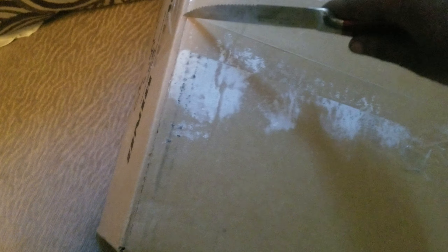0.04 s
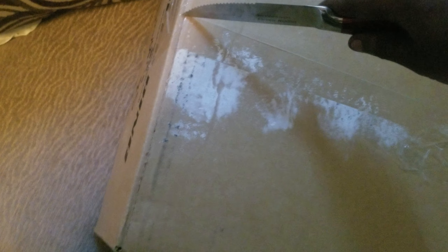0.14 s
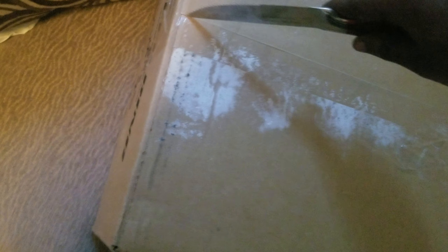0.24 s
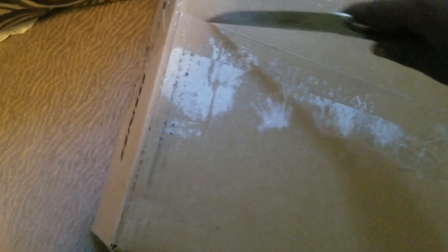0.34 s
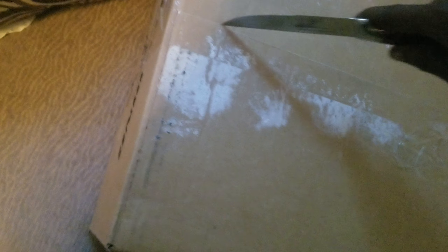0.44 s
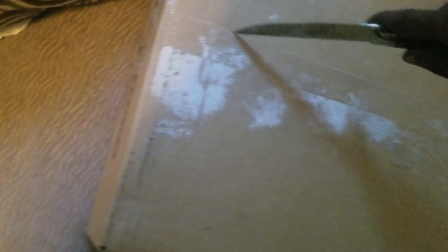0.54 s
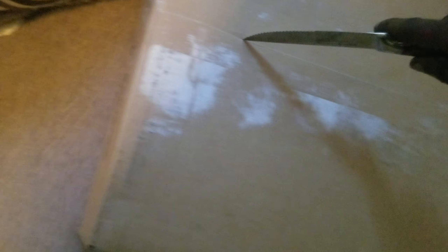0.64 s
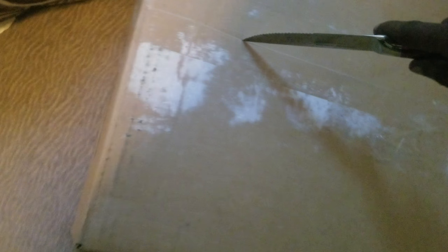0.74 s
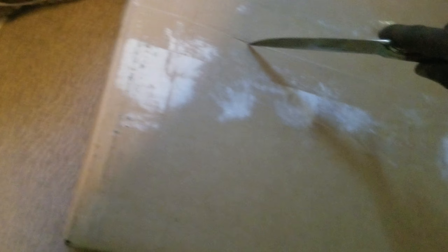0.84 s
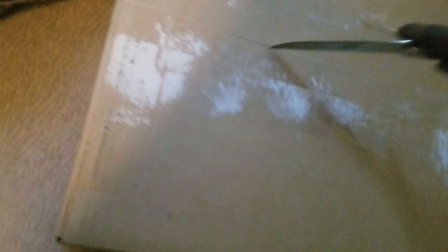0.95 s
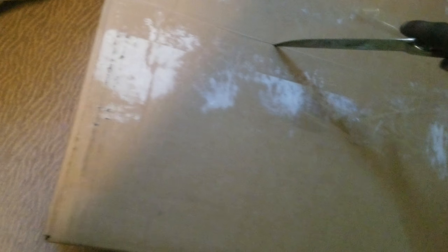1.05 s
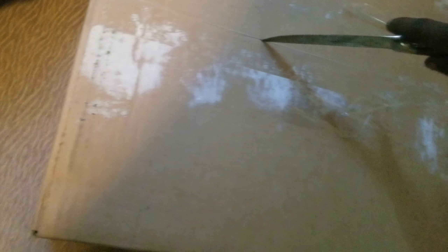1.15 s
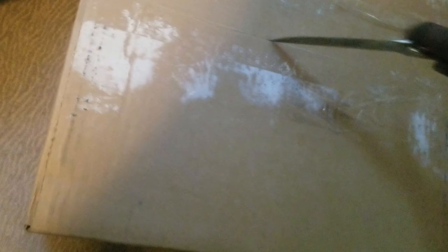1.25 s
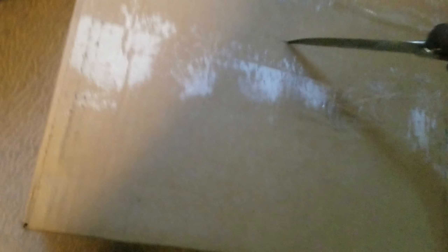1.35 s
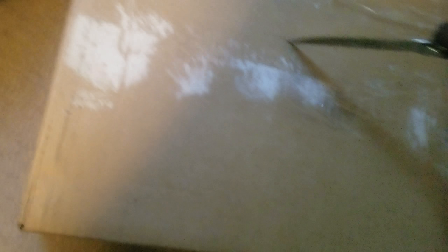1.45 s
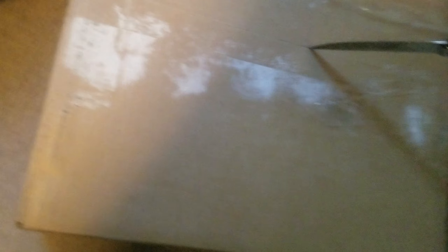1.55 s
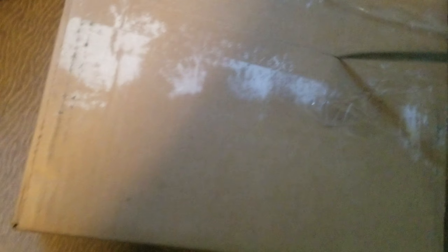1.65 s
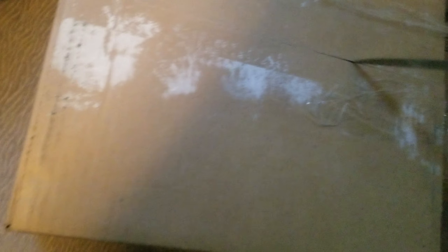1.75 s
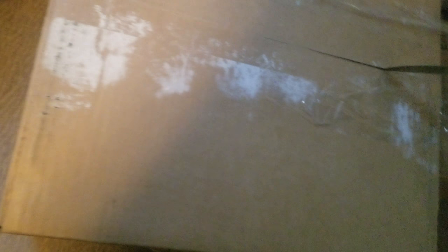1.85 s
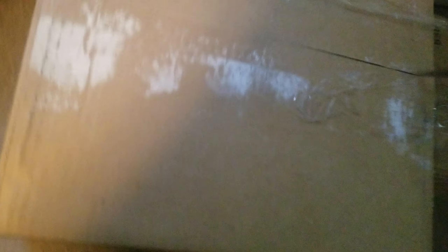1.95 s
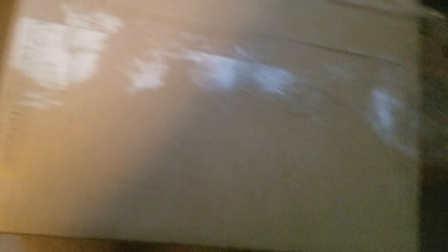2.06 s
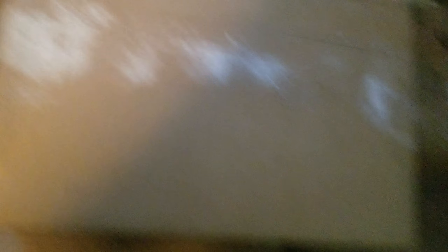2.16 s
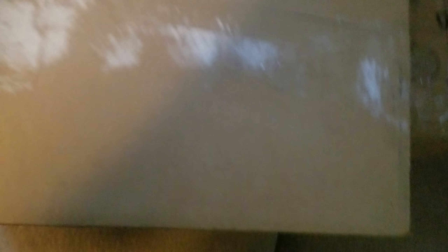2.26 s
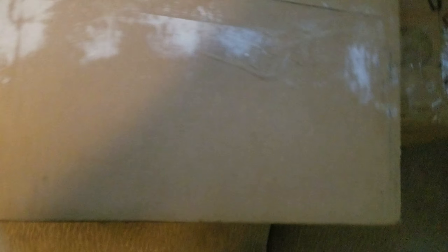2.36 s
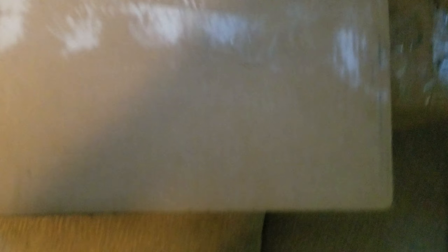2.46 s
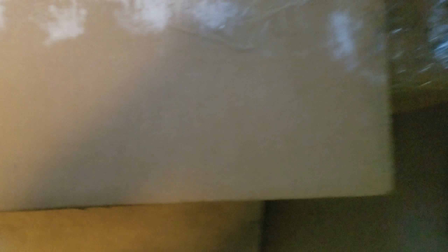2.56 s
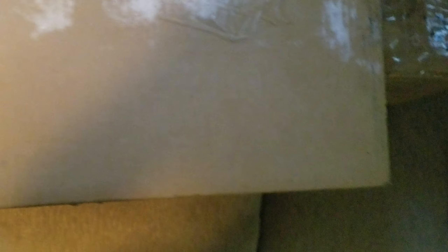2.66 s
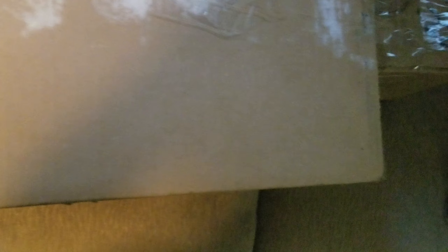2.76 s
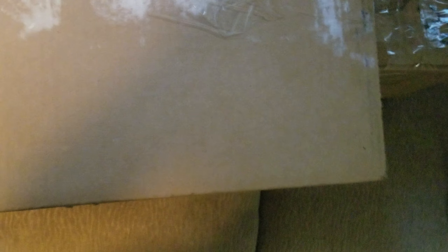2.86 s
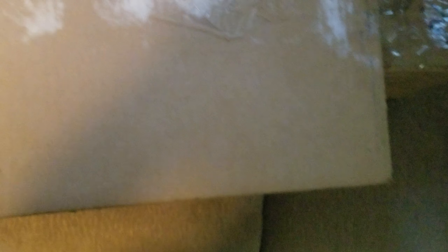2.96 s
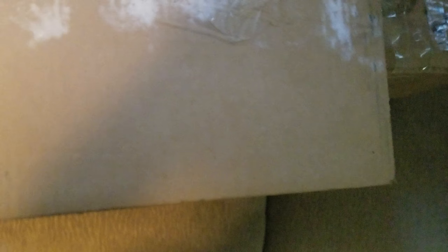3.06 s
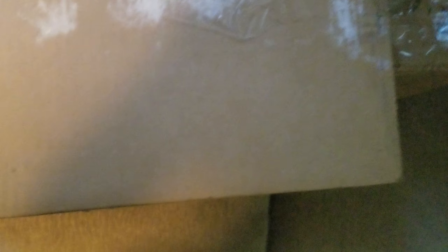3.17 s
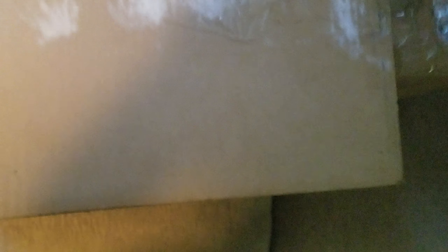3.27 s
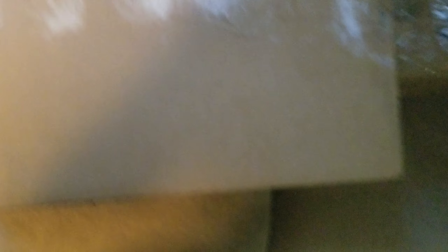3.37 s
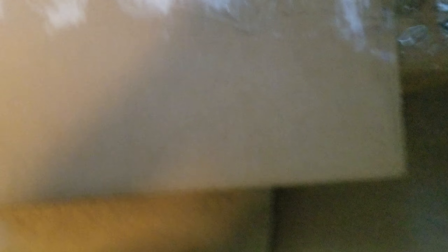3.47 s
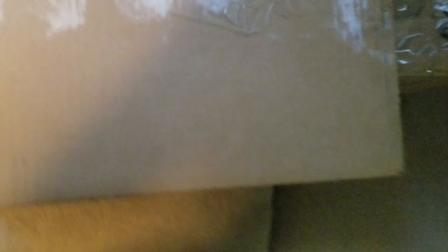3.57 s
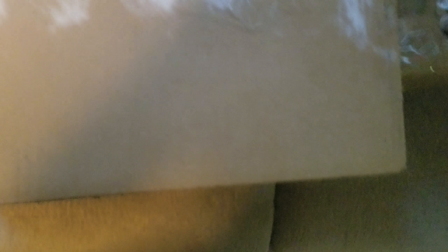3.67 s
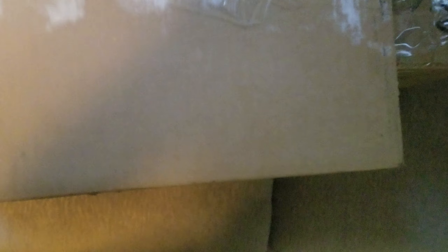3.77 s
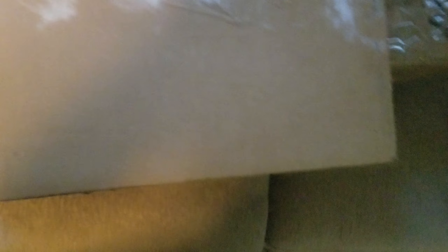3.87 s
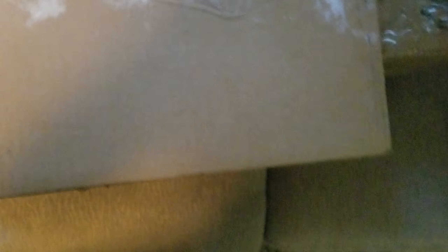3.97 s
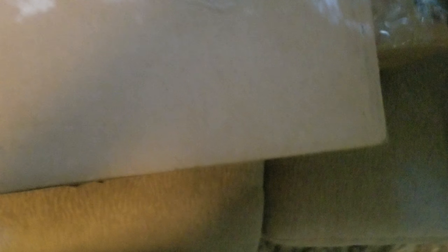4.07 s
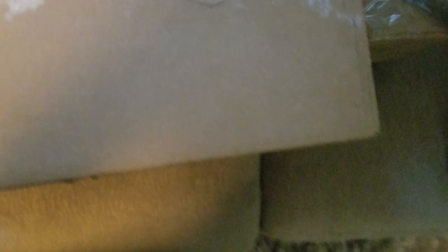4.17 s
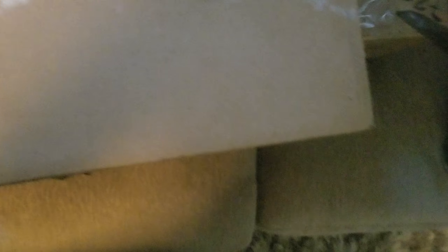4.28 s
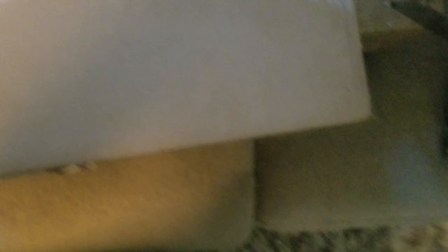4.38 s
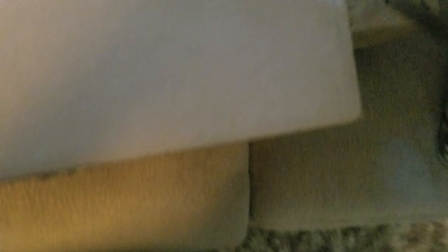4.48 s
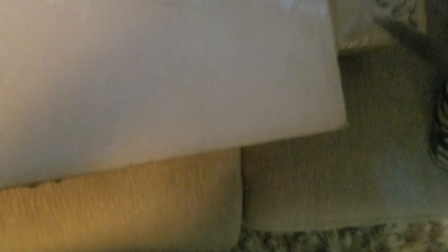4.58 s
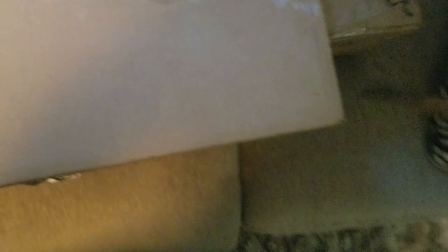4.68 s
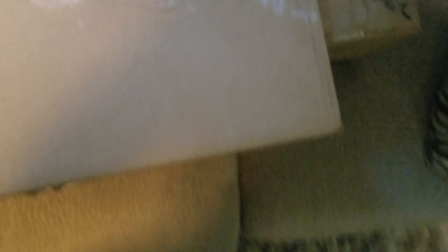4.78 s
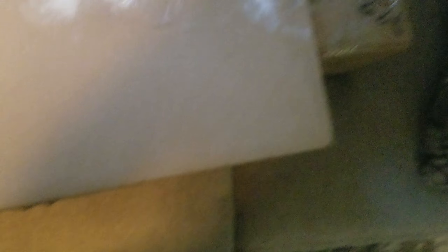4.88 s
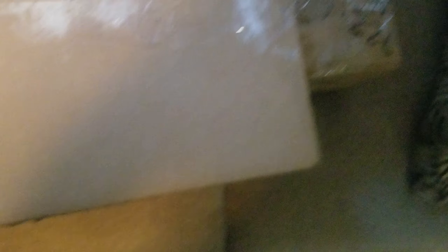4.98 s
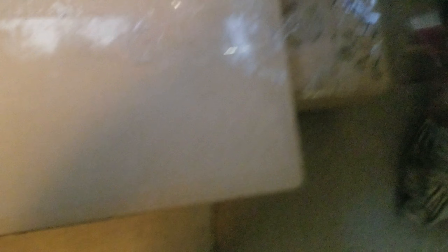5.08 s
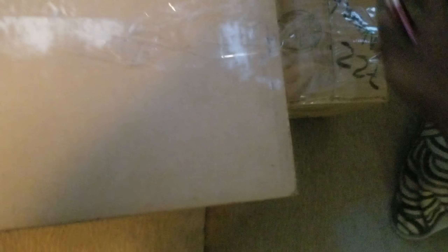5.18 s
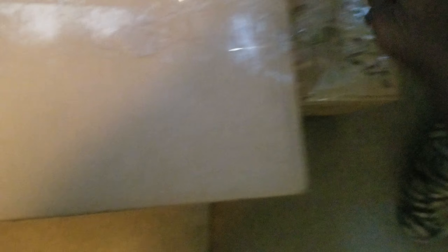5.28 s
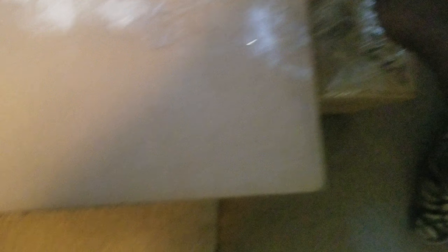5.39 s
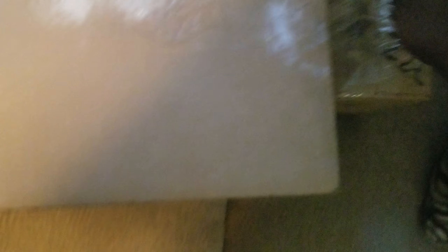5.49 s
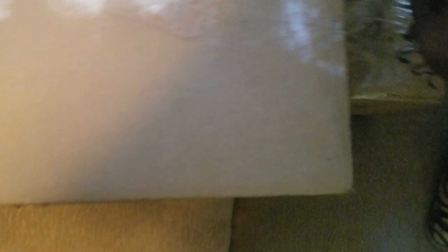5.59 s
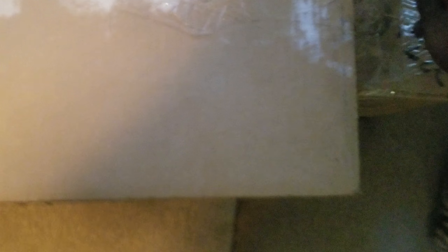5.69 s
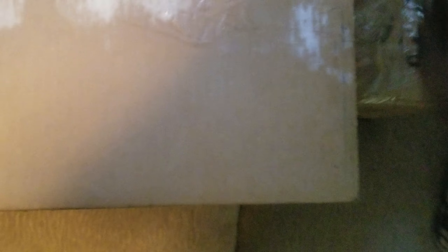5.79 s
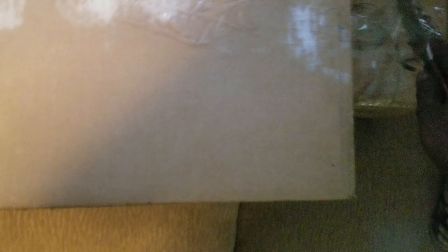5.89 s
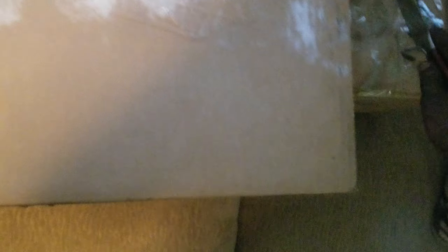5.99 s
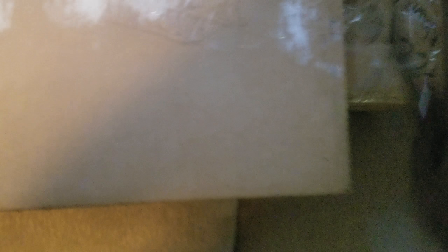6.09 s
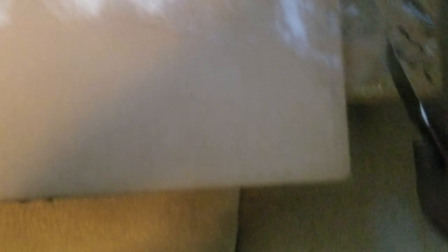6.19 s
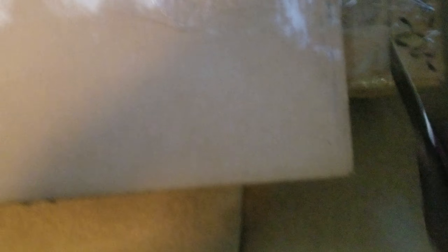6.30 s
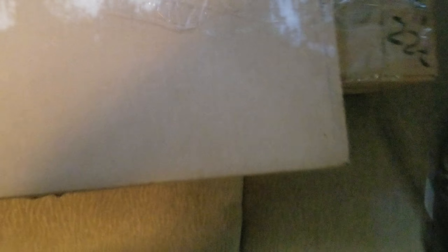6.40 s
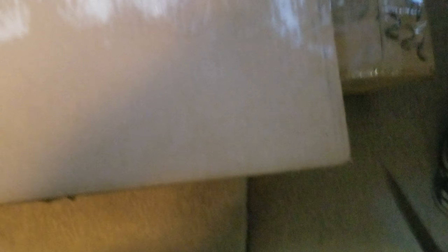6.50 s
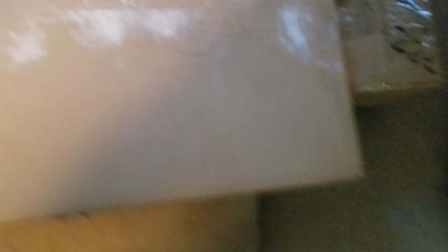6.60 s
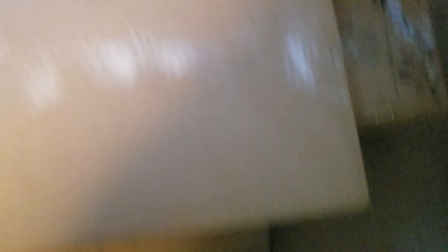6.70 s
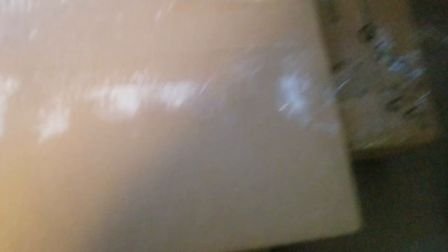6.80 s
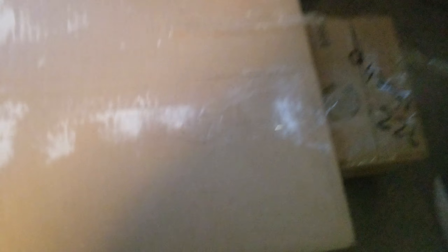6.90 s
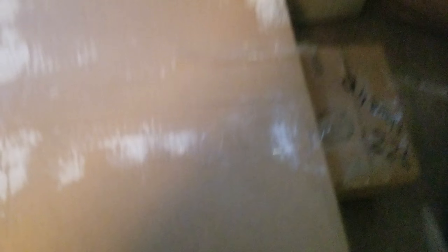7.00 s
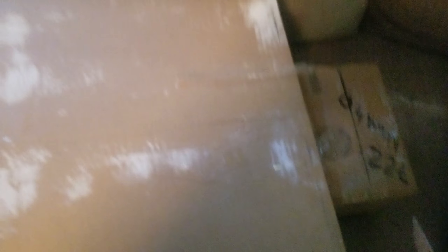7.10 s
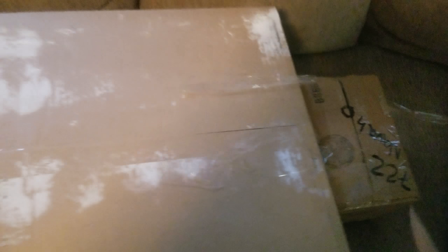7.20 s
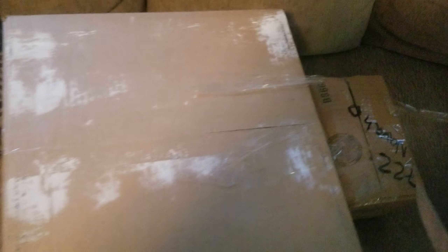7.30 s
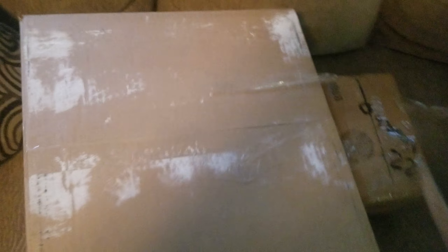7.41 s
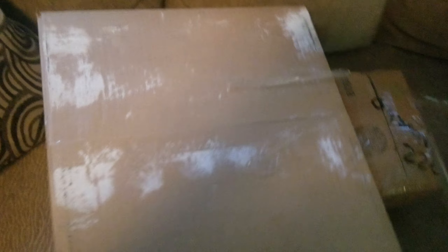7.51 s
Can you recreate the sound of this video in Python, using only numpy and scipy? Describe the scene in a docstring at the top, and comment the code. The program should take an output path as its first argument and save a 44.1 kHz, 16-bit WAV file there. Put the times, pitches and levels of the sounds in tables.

```python
"""A quiet living room, taken close with a hand-held pair of microphones over a faint hiss and a low hum.
A knife tip drags through plastic wrap over a cardboard box, skipping on the corrugations, then saws and
picks at the film round a second, smaller box. Uneven slips of the tip excite the film, which snaps and
crackles, and the cardboard, which rasps and rumbles. Damped swings make the hollow box thud, a thin sine
is the blade singing, and short puffs of noise rustle nearby."""
import sys
import numpy as np
from scipy import signal
from scipy.fft import rfft, irfft
from scipy.io import wavfile
from scipy.ndimage import map_coordinates

SR = 44100
rng = np.random.default_rng(int(sys.argv[2]) if len(sys.argv) > 2 else 0)


def master(y):
    """Save y as 16-bit WAV."""
    cut = np.clip(np.atleast_2d(y).T, -1, 1)
    pcm = np.round(cut * 32767)  # scale
    wavfile.write(sys.argv[1], SR, pcm.astype(np.int16))


N = 332514  # length in samples


def gain_of(db):
    """Decibels to amplitude."""
    return 10 ** (np.asarray(db) / 20)


def evened(x):
    """Scales to unit rms."""
    return x / np.sqrt(np.mean(x ** 2) + 1e-20)


def peaked(x):
    """Scales to unit peak."""
    return x / (abs(x).max() + 1e-12)


def read(points, hz):
    """Looks a table up on a log-frequency axis."""
    f, value = np.transpose(points)
    return np.interp(np.log(hz + 1), np.log(f + 1), value)


def add(mix, s, sound):
    """Mixes a sound in at time s, cutting it off at the end of the mix."""
    part = mix[round(s * SR):][:len(sound)]
    part += sound[:len(part)]


def colour(x, points):
    """Causal minimum-phase filter with the gain curve of a (hz, gain_db) table."""
    gain_db = np.maximum(read(points, abs(np.fft.fftfreq(8192, 1 / SR))), -100)
    log_gain = np.log(gain_of(gain_db))
    response = np.exp(np.conj(signal.hilbert(log_gain)))
    taps = np.fft.ifft(response).real[:4096]
    return signal.oaconvolve(x, taps[(None,) * (x.ndim - 1)], axes=-1)[..., :x.shape[-1]]


def resonate(x, hz, width):
    """One damped resonance of gain 1, its width in Hz."""
    pole = np.exp((2j * np.pi * hz - np.pi * width) / SR)
    return 2 * signal.lfilter([1 - abs(pole)], [1, -pole], x).real


def band(x, lo_hz, hi_hz):
    """Band-pass."""
    return signal.sosfilt(signal.butter(2, [lo_hz, hi_hz], "bandpass", fs=SR, output="sos"), x)


def diffuse(a, b):
    """Two unrelated signals become a pair that is much alike in the bass and little in the treble."""
    # Likeness of diffuse sound at the two microphones: hz, likeness (0 to 1)
    likeness = [(60, 0.83), (300, 0.84), (640, 0.24), (1400, 0.14), (3000, 0.092)]
    alike = np.clip(read(likeness, np.fft.rfftfreq(len(a), 1 / SR)), 0, 1)
    mixed = alike * rfft(a) + np.sqrt(1 - alike ** 2) * rfft(b)
    return np.array([a, irfft(mixed, len(a))])


def grit(size, per_s, spread_db, bed):
    """Tiny slips of uneven strength over a smooth bed of friction."""
    strength = gain_of(spread_db * np.minimum(rng.exponential(1, size), 4))
    slips = strength * (rng.random(size) < per_s / SR)
    slips = signal.lfilter([1], [1, -np.exp(-1 / (0.00047 * SR))], slips)  # each decays in 0.47 ms
    return evened((bed + evened(slips)) * rng.standard_normal(size))


def room_tone():
    """Faint hiss, and a low drone swelling in the room's standing waves."""
    # Spectrum of the hiss: hz, gain_db
    air_curve = [(70, -18), (180, -5.5), (300, -10), (600, -21.5), (850, -22.5), (1150, -14.5),
                 (2000, -18.5), (3100, -23.5), (4030, -20), (5200, -30.5), (7500, -29), (8300, -42),
                 (14000, -57)]
    # Steady resonances of the drone: pitch_hz, width_hz, level_db
    hum_rows = [(40, 68, -82), (61.7, 18, -72.5), (154.1, 10.4, -68), (238.3, 18, -72.5)]
    # Swelling and fading of two stronger low tones: time_s, lower_level_db, upper_level_db
    tone_levels = [(0, -44.5, -68), (0.6, -65, -48), (2.1, -66, -58.5), (2.5, -58, -70), (3.1, -69, -52),
                   (3.7, -65.5, -68), (4.801, -70, -62), (5.198, -65.5, -68.5), (6.498, -58, -63),
                   (7.54, -59, -58.5)]
    tones_hz = (91.4, 123.4)
    hiss = colour(rng.standard_normal((2, N)), air_curve)
    hiss *= gain_of(-67) / np.sqrt(np.mean(band(hiss, 300, 16000) ** 2))

    drone = np.zeros(N)
    for hz, width, db in hum_rows:
        once = resonate(rng.standard_normal(N), hz, width)
        drone += gain_of(db) * evened(resonate(once, hz, width))

    s, *tones_db = np.transpose(tone_levels)
    t = np.arange(N) / SR
    for hz, db in zip(tones_hz, tones_db):
        fuzz = evened(resonate(rng.standard_normal(N), hz, 11))
        tone = evened(np.sin(2 * np.pi * hz * t) + 1.1 * fuzz)
        drone += gain_of(np.interp(t, s, db)) * tone
    return diffuse(*hiss) + drone


def drag():
    """The same slips excite film, cardboard face and box hollow; each move has its own film pitch."""
    # Strokes of the blade rubbing along: start_s, length_s, level_db, film_pitch_hz, card_rel_db
    stroke_rows = [(0, 0.34, -56, 3940, -5), (0.239, 0.11, -49.5, 5160, 0.5), (0.45, 0.39, -65, 5100, 5),
                   (0.85, 0.07, -43, 2590, 2.5), (1.147, 0.21, -52, 2820, 3), (1.421, .37, -50, 3380, 3.5),
                   (1.737, 0.26, -43, 2930, 6), (3.177, 0.17, -49, 3850, -2), (3.433, 0.13, -49, 3930, -4),
                   (3.683, 0.061, -40, 3700, 1), (3.771, 0.031, -52, 4160, 3), (3.868, 0.13, -51, 3560, 2),
                   (4.079, 0.11, -50.5, 4020, 1), (4.451, 0.1, -52, 4180, -5),
                   (4.603, 0.087, -59.5, 4130, 1.5), (5.277, 0.22, -46.5, 2230, -4.5),
                   (5.542, 0.12, -52.5, 3100, -3.5), (5.673, 0.075, -43.5, 3700, -2.5),
                   (5.738, 0.12, -35, 3500, 0), (5.956, 0.085, -37.5, 4050, 0),
                   (6.22, 0.14, -37, 4000, 0.5)]
    # Rips where the film gives way at once and the tear dies out:
    # start_s, decay_s, level_db, film_pitch_hz, card_rel_db
    rip_rows = [(0.396, 0.067, -40, 1920, -0.5), (0.74, 0.073, -39, 2050, 2),
                (0.932, 0.038, -29.5, 3270, -1.5), (2.723, 0.11, -55.5, 2370, -6),
                (3.063, 0.053, -45, 3670, -11.5), (3.362, 0.022, -27, 3700, -1),
                (3.519, 0.027, -36, 3760, -2.5), (4.212, 0.042, -49, 3480, 2.5),
                (4.337, 0.012, -63, 3300, -7), (4.573, 0.012, -35, 3040, -4),
                (5.496, 0.019, -22.5, 3560, -19), (6.051, 0.022, -31, 4340, -3),
                (6.083, 0.065, -48, 3420, 4)]
    # Spectrum of the crackling film: hz, gain_db
    crackle_curve = [(710, -33.5), (1200, 1.5), (2100, 1), (2450, -0.5), (3880, -1.5), (5050, -9),
                     (6940, -4.5), (8270, -15), (12800, -10), (15600, -11.5), (16500, -39.5)]
    # Spectrum of the rasping cardboard face: hz, gain_db
    rasp_curve = [(210, -33), (350, 9), (441, 1), (647, -7.5), (860, -3.5), (1700, -19), (2210, -66.5),
                  (3740, -120)]
    # Spectrum of the big box's hollow rumble: hz, gain_db
    rumble_curve = [(15, -34), (25, 4), (54, 0), (119, 7), (298, -0.5), (385, -7.5), (450, -7.5),
                    (580, -52.5), (990, -120)]
    box_change_s = 2.3  # the knife moves on to the small box
    stroke_rise_s, stroke_release_s = (0.026, 0.047), 0.018  # quick on the big box, slower when sawing
    rip_rise_s, rip_hold_s = 0.00389, 0.021
    big_box_db, small_box_db = (-1, -0.5), (-3, 2)  # the cardboard's share as (face rasp, hollow rumble)

    slips, out = grit(N, per_s=500, spread_db=3.5, bed=1.0), np.zeros(N)
    crackle = evened(colour(slips, crackle_curve))
    rasp = evened(colour(slips, rasp_curve))
    deep = evened(colour(slips, rumble_curve))
    shallow = evened(band(slips, 140.4, 329))  # the second box is smaller

    moves = []
    for s, length, *row in stroke_rows:
        rise = min(stroke_rise_s[s > box_change_s], length)
        moves.append((s, rise, length, stroke_release_s, *row))
    for s, decay, *row in rip_rows:
        moves.append((s, rip_rise_s, rip_hold_s, decay, *row))

    for s, rise, length, decay, db, hz, card_db in moves:
        part = slice(round(s * SR), round((s + length + 6 * decay) * SR))
        t = np.arange(len(slips[part])) / SR
        swell = np.minimum(t / rise, 1) ** 2 * np.exp(-np.maximum(t - length, 0) / decay)
        # a higher film pitch brings more crackle
        film = hz / 5000 * crackle[part] + 0.6 * evened(resonate(slips[part], hz, 870))
        box, (rasp_db, rumble_db) = (deep, big_box_db) if s < box_change_s else (shallow, small_box_db)
        face = gain_of(card_db + rasp_db) * rasp[part]
        hollow = gain_of(card_db + rumble_db) * box[part]
        add(out, s, gain_of(db) * swell * (film + face + hollow))
    return out


def snaps():
    """A sharp break and a dying burst of slips shake the film and the cardboard beneath."""
    # Snaps of the film: start_s, level_db, film_pitch_hz, card_rel_db
    snap_rows = [(0.031, -34, 3940, -28), (0.0817, -49, 3910, -25), (0.1084, -23.5, 3860, -32),
                 (0.139, -10.5, 3520, -33), (0.28, -12.5, 3930, -21), (0.4059, -18, 2060, -10),
                 (0.938, -16, 3100, -28), (0.9502, -8.5, 2770, -14.5), (0.9627, -6.5, 3080, -10),
                 (1.526, -19, 2950, 2), (1.568, -16, 2980, 4.5), (1.632, -17.5, 3000, -9),
                 (1.697, -20, 3000, -6.5), (1.8957, -7, 2800, -4.5), (1.9838, -7, 3240, -13),
                 (1.989, -12, 2720, -39), (2.516, -46.5, 1900, -6.5), (2.538, -58, 3800, -14),
                 (2.728, -32, 2580, -15), (2.738, -37.5, 6270, -11), (2.8748, -19.5, 3330, -22.5),
                 (2.894, -27.5, 1500, -13), (3.018, -26, 7600, -15.5), (3.0781, -22, 3600, -16),
                 (3.1228, -23.5, 3750, -30), (3.2597, -18.5, 6800, -24), (3.2856, -22, 3680, -15),
                 (3.2931, -15.5, 3800, -11), (3.3641, -8, 3880, -8.5), (3.3734, -4, 3650, -16),
                 (3.722, -17, 3850, -4), (3.7278, -17, 3430, -11), (3.7463, -7.5, 3850, -9),
                 (3.756, -25, 4000, -14), (3.802, -31, 1500, -0.5), (3.936, -13.5, 5300, -2),
                 (3.9701, -19.5, 4930, -5.5), (4.128, -18.5, 4630, -8), (4.2204, -17.5, 2260, -2.5),
                 (4.3415, -23, 3770, -16.5), (4.5274, -24.5, 4630, -14), (4.549, -23, 3450, -25),
                 (4.57, -21.5, 2170, -8.5), (4.585, -22.5, 6050, -2), (4.733, -40.5, 1100, 4),
                 (4.882, -42, 1500, -1.5), (5.3145, -20.5, 1860, -19), (5.346, -12.5, 2430, -12),
                 (5.3914, -12, 4400, -38), (5.4086, -9.5, 3280, -34), (5.4442, -7.5, 5550, -21),
                 (5.4585, -8, 3740, -16), (5.479, -18, 2010, -10.5), (5.4989, -6, 2050, -18.5),
                 (5.5209, -3.5, 2060, -41), (5.5283, -2, 3500, -8.5), (5.5453, -9, 3380, -18),
                 (5.6467, -20.5, 3950, -11.5), (5.723, -17, 2000, -31), (5.7907, -26, 3700, -16.5),
                 (5.822, -26, 6000, -15), (5.978, -31.5, 4800, -29), (5.9943, -28.5, 3750, -0.5),
                 (6.0542, -19.5, 2470, 8.5), (6.0655, -5.5, 4170, 1), (6.0818, -10.5, 3620, -20),
                 (6.1015, -22, 2490, 7.5), (6.2761, -21, 1860, 3), (6.328, -10.5, 5950, -11.5),
                 (6.361, -14, 4400, -18), (7.3269, -18.5, 2050, -27), (7.3345, -35, 3000, -19)]
    decay_s = 0.0034
    sizzle_db, sizzle_db_per_octave = -22.5, 6  # at 3.5 kHz; tauter, higher film sizzles more
    out, t = np.zeros(N), np.arange(2500) / SR
    for s, db, hz, card_db in snap_rows:
        burst = grit(len(t), per_s=900, spread_db=7.0, bed=1.0) * np.exp(-t / decay_s)
        sharp_break = 3.6 * np.exp(-t / 0.00029) * rng.choice([-1., 1.], len(t))
        force = burst * np.minimum(t / 0.00073, 1) + sharp_break
        film = resonate(force, hz, 840) + 0.17 * band(force, 1900, 2.14 * hz)
        card = resonate(force, 320, 200) - resonate(force, 1078, 260)
        sizzle = peaked(band(force, 9700, 14640))
        sizzle_gain = gain_of(sizzle_db + sizzle_db_per_octave * np.log2(hz / 3500))
        sound = peaked(film) + gain_of(card_db) * peaked(card) + sizzle_gain * sizzle
        add(out, s, gain_of(db) * sound)
    return out


def thuds():
    """A short scratch as the tip lets go; the box's air and walls then swing for a few cycles."""
    # Thuds as the tip drops over a corrugation or the hand jerks: start_s, level_db
    thud_rows = [(0.268, -30), (0.75, -34), (0.949, -18.5), (0.996, -11.5), (1.045, -35), (1.189, -11),
                 (1.221, -14), (1.247, -12), (1.281, -13), (1.341, -22.5), (1.459, -16.5), (1.49, -14.5),
                 (1.524, -13.5), (1.544, -13.5), (1.568, -12.5), (1.598, -20), (1.629, -17.5),
                 (1.659, -16.5), (1.694, -13), (1.728, -16.5), (1.776, -17.5), (1.894, -23), (3.287, -31),
                 (3.366, -32), (3.745, -31), (4.217, -30), (5.34, -32.5), (6.05, -38), (6.064, -15.5),
                 (6.285, -26.5), (6.312, -19)]
    box_hz = 186
    scratch_db, scratch_growth = -26.5, 0.62  # for a -21.5 dB thud; growth in dB per dB of thud
    out, t = np.zeros(N), np.arange(2000) / SR
    u = t / 0.002
    swing = peaked(-u ** 3 * np.exp(-u) * np.sin(2 * np.pi * box_hz * (t - 0.0022)))
    for s, db in thud_rows:
        slip = rng.standard_normal(len(t)) * (t / 0.0022) * np.exp(-t / 0.0025)
        scratch = band(slip, 300, 1100) + 0.51 * band(slip, 2000, 3370) + 0.097 * band(slip, 6800, 18000)
        scratch_gain = gain_of(scratch_db + scratch_growth * (db + 21.5))
        add(out, s, gain_of(db) * swing + scratch_gain * peaked(scratch))
    return out


def rustles():
    """Short smooth puffs of band-passed noise, mostly in the low treble."""
    # Soft rustles nearby: start_s, level_db, decay_s, centre_hz
    rustle_rows = [(2.512, -47, 0.041, 1680), (6.5776, -43, 0.084, 3500), (6.958, -42.5, 0.054, 3500),
                   (7.2706, -52, 0.26, 3030), (7.4422, -47.5, 0.16, 3670)]
    out, t = np.zeros(N), np.arange(12000) / SR
    for s, db, decay, hz in rustle_rows:
        noise = rng.standard_normal(len(t))
        puff = band(band(noise, 0.76 * hz, 1.25 * hz), 0.54 * hz, 2.4 * hz)
        swell = np.minimum(t / 0.0097, 1) * np.exp(-t / decay)
        add(out, s, gain_of(db) * peaked(puff * swell))
    return out


def blade():
    """The steel rings thinly once it leaves the film: a sine that swells in and dies exponentially."""
    # Rings of the blade: start_s, level_db
    ring_rows = [(4.68, -60), (6.4, -65)]
    ring_hz, t60_s = 4130, 0.7
    out, t = np.zeros(N), np.arange(SR // 2) / SR
    for s, db in ring_rows:
        envelope = gain_of(db - 60 * t / t60_s) * np.minimum(t / 0.02, 1)
        add(out, s, envelope * np.sin(2 * np.pi * ring_hz * t))
    return out


def reverb(x):
    """Sparse reflections of random sign, each band dying at its own speed; soft furniture keeps it short."""
    # Decay of the room: hz, t60_s
    room_decay = [(150, 0.23), (500, 0.23), (1500, 0.29), (4000, 0.29), (12000, 0.33)]
    taps = np.zeros((2, SR // 2))
    # one reflection at a random place in every 20 samples
    at = np.arange(330, SR // 2 - 20, 20) + rng.integers(0, 20, (2, (SR // 2 - 331) // 20))
    np.put_along_axis(taps, at, rng.choice([-1., 1.], at.shape), 1)
    hz, t, z = signal.stft(taps, SR, nperseg=256)
    fade = gain_of(-60 * t / read(room_decay, hz)[:, None])
    tail = diffuse(*signal.istft(z * fade, SR, nperseg=256)[1])
    return signal.oaconvolve(x[None], tail / np.linalg.norm(tail[0]), axes=1)[:, :N]


def scatter(x):
    """Hand, blade and crumpled film scatter the treble differently to each microphone, and keep moving."""
    t, poses = np.arange(400) / SR, 6
    echoes = rng.standard_normal((poses, 2, len(t))) * np.exp(-t / 0.0015)
    taps = 0.15 * band(echoes, 2500, 18000)
    taps[..., 0] += 1  # the straight path
    taps /= np.linalg.norm(taps, axis=-1, keepdims=True)
    turn = np.arange(N) / SR * 30.  # thirty poses a second, cycling through the six
    out = np.zeros((2, N))
    for k in range(poses):
        share = np.sqrt(np.maximum(1 - abs((turn - k) % poses - 1), 0))  # crossfades neighbouring poses
        out += signal.oaconvolve(share * x, taps[k], axes=1)[:, :N]
    return out / 1.306


def scene():
    """The direct sound reaches the left microphone a little late; the lag follows the moving hand."""
    # Lag of the left microphone: time_s, lag_ms
    left_lag = [(0, 0.01), (.8, 0.026), (1.7, 0.15), (2.5, .17), (5.8, 0.15), (6.5, 0.15)]
    knife = snaps() + thuds() + drag() + blade() + rustles()
    n = np.arange(N)
    lag_ms = np.interp(n / SR, *np.transpose(left_lag))
    late = map_coordinates(knife, [n - lag_ms * SR / 1000], order=3)
    direct = scatter(np.array([late, knife]))
    # the box's bass is near field and fills the room weakly
    far = colour(knife, [(200, -10.5), (600, 0.5), (16000, -4)])
    wet = gain_of(-11.) * reverb(far)
    return gain_of(-0.5) * direct + wet + room_tone()


def record(dry):
    """Unlike microphone ports, the left louder in the low treble, then hiss, clipping and a treble limit."""
    # Imbalance of the ports, split evenly between them: hz, left_over_right_db
    port_curve = [(60, 0), (110, 0.5), (200, 1.5), (380, 1.5), (700, 1), (1290, 5), (2380, 12.5),
                  (4400, 13), (8120, 6.0), (15000, -5.5)]
    hz, db = np.transpose(port_curve)
    roll_off = [(15600, 2), (15950, -21.0), (17000, -19.5)]  # hz, gain_db
    hiss = gain_of(-75.5) * evened(band(rng.standard_normal(dry.shape), 9000, 21000))
    ports = np.array([colour(x, np.transpose([hz, side * db / 2])) for x, side in zip(dry, (1, -1))])
    clipped = np.clip(ports + hiss, -0.9, 0.9)
    edge = signal.firwin(511, 16900, window=("kaiser", 9), fs=SR)  # band limit at 16.9 kHz
    return signal.oaconvolve(colour(clipped, roll_off), edge[None], "same")


dry = scene()
out = record(dry)
master(out)
```